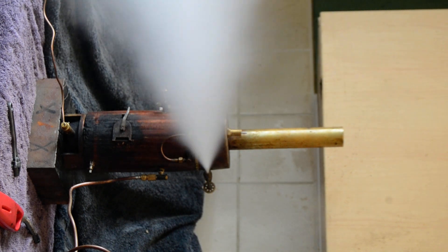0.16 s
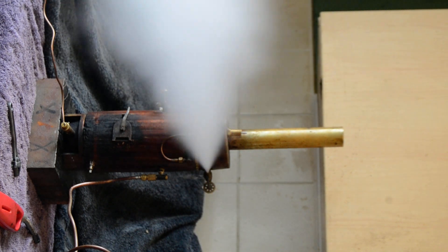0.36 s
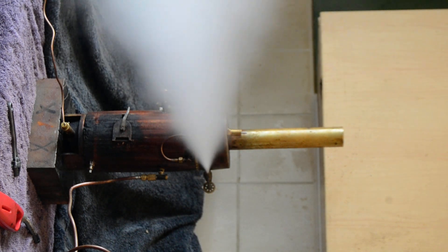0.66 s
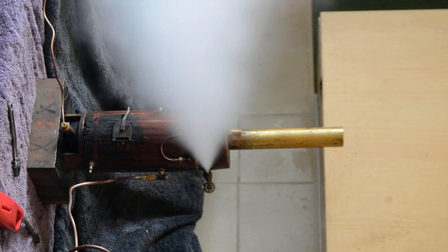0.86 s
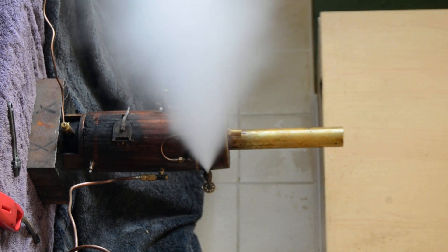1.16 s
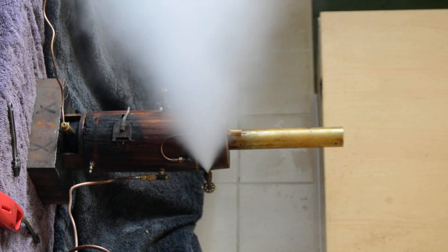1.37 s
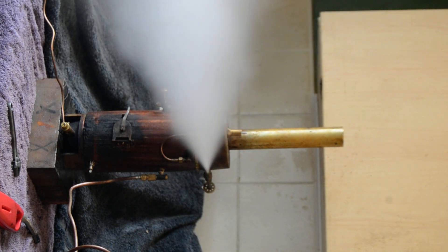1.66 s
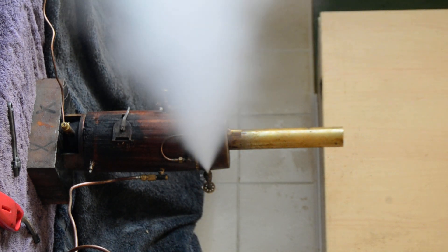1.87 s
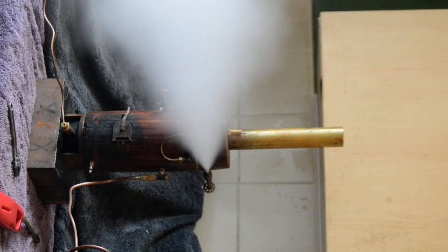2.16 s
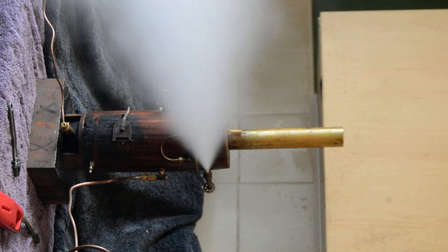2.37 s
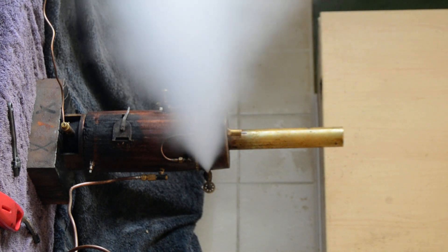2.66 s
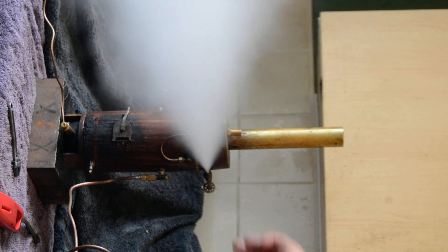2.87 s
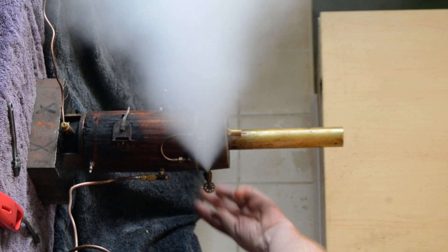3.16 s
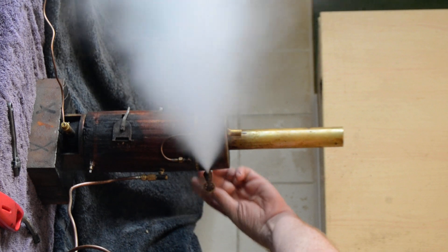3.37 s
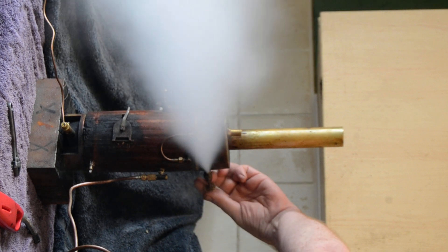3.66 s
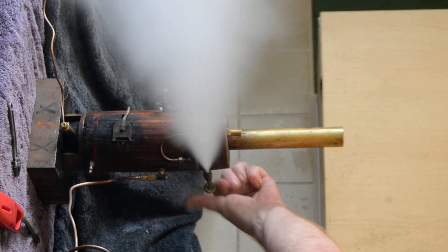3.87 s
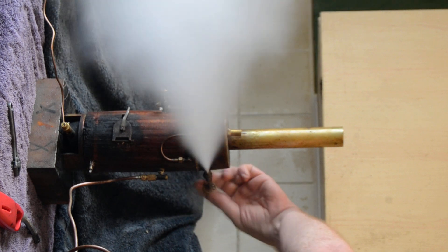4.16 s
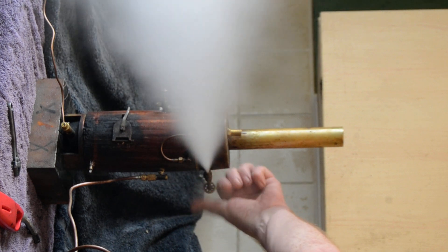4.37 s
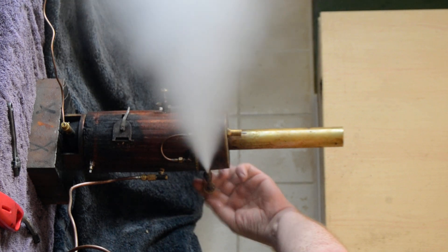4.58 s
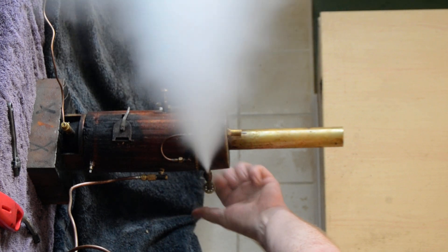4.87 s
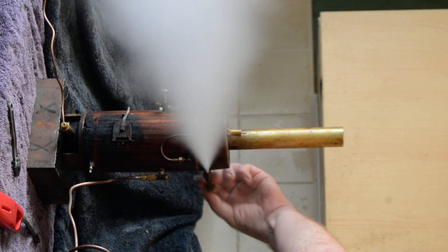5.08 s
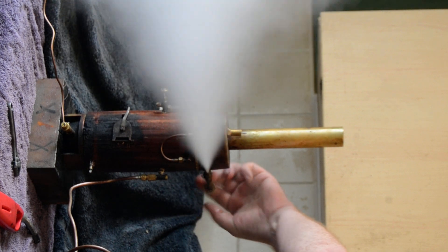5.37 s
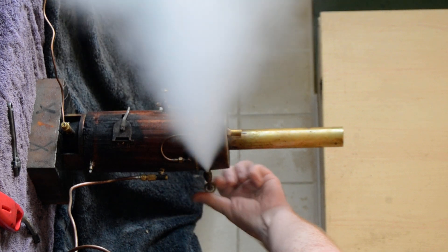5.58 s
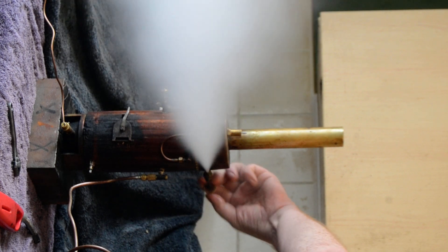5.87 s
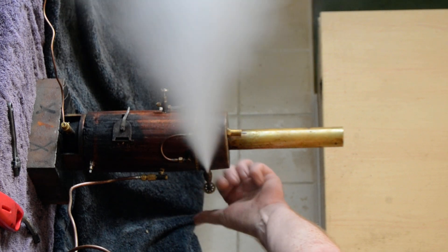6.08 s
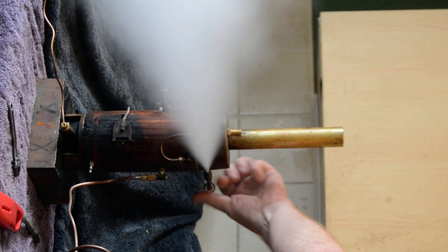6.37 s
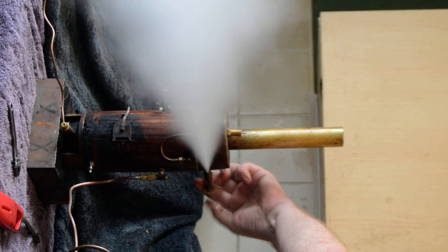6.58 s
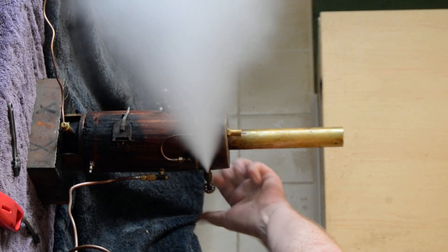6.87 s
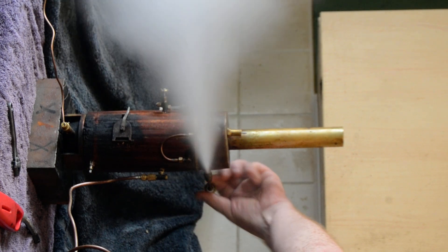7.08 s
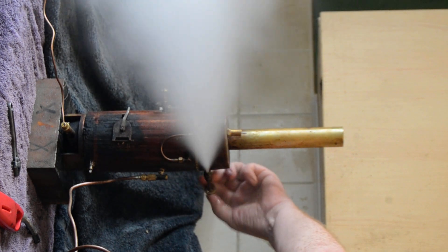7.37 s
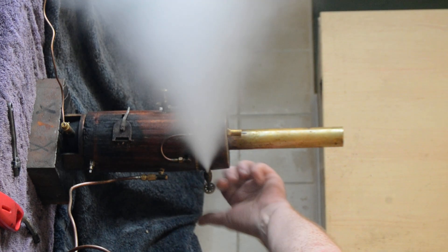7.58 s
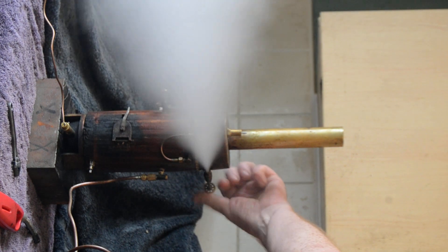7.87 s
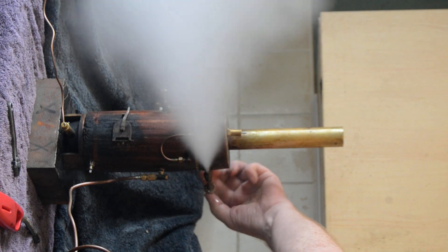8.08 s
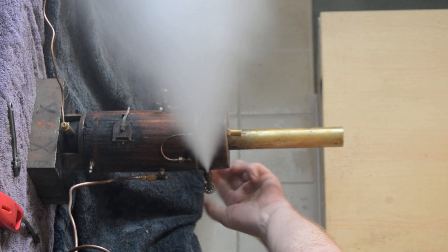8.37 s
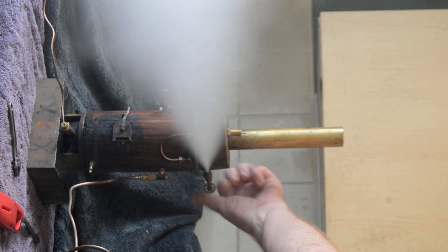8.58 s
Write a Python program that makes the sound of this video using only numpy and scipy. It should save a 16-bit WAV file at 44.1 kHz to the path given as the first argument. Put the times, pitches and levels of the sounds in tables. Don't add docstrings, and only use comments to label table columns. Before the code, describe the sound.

Steady high-pressure steam rushes from a small boiler's valve, heard very close in a hard, short-echoing room. It begins at full strength, fairly even, then grows more sputtery as a hand works the wheel, with quick dips and muffled surges around the middle and later part. A weak rumbling draught breaks up below the hiss. The sound is gritty, centred and still blowing at the end.

```python
import sys
import numpy as np
from scipy import signal
from scipy.fft import rfft, irfft, next_fast_len
from scipy.io import wavfile
from scipy.ndimage import uniform_filter1d

SR = 44100
rng = np.random.default_rng(int(sys.argv[2]) if len(sys.argv) > 2 else 0)


def to_wav(sig):
    pcm = np.clip(np.atleast_2d(sig), -1, 1) * 32767
    pcm = np.round(pcm).astype(np.int16)
    wavfile.write(sys.argv[1], SR, pcm.T)


def boost_factor(decibels):
    exponent = np.asarray(decibels, float) / 20
    return 10 ** exponent


N = 385423

# frequency in Hz, time to fall 60 dB in s.
ROOM_DECAY = [(300, 0.39), (2000, 0.26), (9000, 0.18)]
# delay in ms, gain.
ECHOES = [(1.07, -0.019), (1.4, 0.007), (2.05, -0.0023), (4.8, 0.01), (5.85, -0.022), (7.4, -0.034),
          (9.54, 0.038), (22.3, -0.11)]
# frequency in Hz, width in Hz, level in dB.
STANDING_WAVES = [(231, 30, -1.2), (339, 30, 1.2), (458, 30, -1.6), (522, 30, 1.8), (587, 30, 1.3),
                  (888, 130, -0.9), (1136, 30, -1.6), (1222, 30, -2.9), (1362, 80, 1.9), (1567, 30, 2.5),
                  (1642, 30, -3.1), (1986, 50, 2.3), (2417, 30, 3.6), (2676, 30, -3.0), (2998, 30, -5.5),
                  (3106, 50, 2.3), (3978, 25, 4.5), (4646, 40, -3.8), (4904, 40, 3.7), (5303, 70, -2.6),
                  (5755, 70, 2.3), (7122, 40, 5.7), (7208, 40, -3.3), (7284, 25, 5.3), (7822, 40, -3.9),
                  (7930, 110, -6.8), (8317, 40, 4.1), (8511, 25, 4.7), (9146, 70, 4.5), (9932, 40, 4.1)]
# start in seconds, length in seconds, drop in dB.
LULLS = [(.5, .14, 5), (1.05, .08, 4), (1.56, .24, 8), (2.16, .1, 5), (2.5, .08, 6), (2.73, .1, 8),
         (2.92, .1, 5), (3.16, .34, 4), (3.66, .14, 5), (4.17, .18, 7), (4.55, .14, 5), (4.88, .17, 10),
         (5.31, .2, 8), (5.67, .16, 7), (6.05, 0.13, 6), (6.4, .09, 6), (6.6, .1, 8), (6.87, .07, 6),
         (7.04, 0.25, 9), (7.7, .11, 9), (8.02, .06, 5), (8.13, .05, 5), (8.27, .24, 14), (8.6, .2, 8)]
# time in seconds, choke in dB, roar surge in dB, muffling in dB,
# clearing time in seconds.
SLUGS = [(0.103, 0.0, 0.7, 2, 0.18), (0.491, 2.5, 1.5, 3.5, 0.13), (0.624, 1, 1.5, 3.3, 0.079),
         (1.565, 2, 4, 2.9, 0.25), (2.271, 2, 2.5, 2.3, 0.19), (2.714, 1.8, 6.5, 1.5, 0.69),
         (3.33, 0.0, 5, 0.5, 0.27), (3.812, -0.5, 6.5, 1, 0.27), (4.137, 0.8, 3.5, 1.8, 0.45),
         (4.55, 1.2, 3.5, 3, 0.17), (4.907, 1.0, 3, 4.5, 0.23), (5.321, 0.2, 0.5, 4, 0.14),
         (5.677, 3, 2.5, 5, 0.13), (6.041, 3.5, 2.5, 5.5, 0.21), (6.414, 2.5, 3, 3.5, 0.11),
         (6.6, 2.5, 4, 3.5, 0.11), (6.84, 3, 1.1, 3, 0.16), (7.065, 7, 5.5, 7, 0.24),
         (7.589, 0.5, 2, 1.6, 0.64), (7.708, 2.2, 7.5, 4.5, 0.066), (7.955, 0.5, 0.5, 1.5, 0.6),
         (8.286, 3.5, 7.5, 1.5, 0.19), (8.407, 3, 2, 2.2, 0.55), (8.727, 4, 12.5, 3.0, 0.04)]
# time in seconds, wetness in dB of roar.
WETNESS = [(0.0, 2.2), (0.79, 2.1), (1.59, 0.45), (2.38, 2), (3.18, -4.5), (3.97, -1.5), (4.77, 0.9),
           (5.56, 2), (6.36, 1.7), (7.15, 1.65), (7.95, 0), (8.74, -0.5)]
# frequency in Hz, density in dB per Hz.
HISS_COLOUR = [(20, 3), (60, -11.5), (170, -17.5), (300, -14.5), (450, -12.5), (900, -8), (1400, -6.5),
               (2900, -5), (3150, -3), (5500, -2.5), (8300, -2), (9250, 0), (10500, -4), (13600, -16.5)]
# frequency in Hz, share of the swing.
ROAR_SHARE = [(150, 0.1), (300, 1.05), (1500, 1.4), (2500, 0.68), (3100, 0)]
FLARE_SHARE = [(2500, 0.42), (3100, 0.87), (4300, 0.52), (5500, 0.069)]
FIZZ_SHARE = [(7000, 0.076), (8500, 0.96), (10500, 1.07), (12000, 1.8)]
# response to choke, surge, muffling and wetness in dB per dB.
LEVEL_LAW = (-0.44, 0.11, -0.018, 0.14)
ROAR_LAW = (-0.32, 0.65, -0.42, 0.84)
FLARE_LAW = (-0.4, 0.17, 0.86, 0.41)
FIZZ_LAW = (0.0077, -0.18, -0.99, -0.28)
DRAUGHT_LAW = (-0.35, -.1, -.3, .3)
# time in seconds, half length in seconds, frequency in Hz,
# half width in Hz, level in dB.
SEAT_SONG = (3.46, .17, 3130, 50, 5)
# frequency in Hz, width in Hz, level in dB.
PORT_NOTCH = (7950, 500, -3.5)
# frequency in Hz, level in dB.
SAMPLING_EDGE = [(10000, 0.5), (10500, -1.5), (11000, -6.5), (11500, -15.5), (11800, -30), (12000, -55)]
# frequency in Hz, level in dB.
MIRROR_LEAK = [(12000, 0), (12300, -8), (12700, -13), (13300, -32.5), (13500, -34), (13700, -50)]
# time in seconds, low edge in Hz, high edge in Hz.
SPLIT_BANDS = [(1.074, 11070, 12490), (1.477, 4500, 5800), (1.477, 9500, 11100), (1.477, 11650, 13700),
               (1.971, 5140, 6340), (2.525, 5560, 6970), (2.525, 7450, 8960), (2.85, 4210, 6180),
               (2.908, 8900, 10420), (3.257, 5180, 6400), (3.596, 5560, 6970), (3.701, 12250, 13700),
               (4.357, 4130, 6400), (4.821, 12250, 13700), (5.23, 6730, 8400), (5.811, 11030, 12490),
               (5.927, 4530, 6400), (7.378, 4100, 6370), (7.378, 6730, 8390), (7.378, 11680, 13170),
               (8.144, 5160, 6400)]


def evened(x):
    return x / np.sqrt(np.mean(x ** 2) + 1e-20)


def read(points, hz):
    f, value = np.transpose(points)
    return np.interp(np.log(hz + 1), np.log(f + 1), value)


def room(x, wet_db=-8, thin_hz=1800):
    taps = np.zeros(SR // 2)
    at = np.arange(60, len(taps) - 20, 20)
    at = at + rng.integers(0, 20, len(at))
    taps[at] = rng.choice([-1., 1.], len(at))
    hz, t, z = signal.stft(taps, SR, nperseg=256)
    decay_db = -60 * t / read(ROOM_DECAY, hz)[:, None]
    thinning = hz / np.hypot(hz, thin_hz)
    tail = signal.istft(z * boost_factor(decay_db) * thinning[:, None], SR, nperseg=256)[1]
    response = boost_factor(wet_db) * tail / np.linalg.norm(tail)
    response[0] += 1
    for ms, gain in ECHOES:
        response[round(ms * SR / 1000)] += gain
    size = next_fast_len(N + SR)
    hz = np.fft.rfftfreq(size, 1 / SR)
    standing_db = sum(db / (1 + (2 * (hz - f) / width) ** 2) for f, width, db in STANDING_WAVES)
    return irfft(rfft(x, size) * rfft(response, size) * boost_factor(standing_db), size)[:N]


def lulls(t, edge_s=0.015):
    s, length, drop_db = np.transpose(LULLS)[:, :, None]
    shut = np.tanh((t - s) / edge_s)
    reopened = np.tanh((t - s - length) / edge_s)
    return (0.5 * drop_db * (shut - reopened)).sum(axis=0)


def valve(t, choke_s=0.049, rise_s=0.023):
    s, choke_db, surge_db, muffle_db, clear_s = np.transpose(SLUGS)[:, :, None]
    since = t - s
    clearing = np.exp(-(np.maximum(since, 0) / clear_s) ** 2)
    burst = 0.5 * (1 + np.tanh(since / rise_s)) * clearing
    choke = (choke_db * np.exp(-(since / choke_s) ** 2)).sum(axis=0)
    surge = (surge_db * burst).sum(axis=0)
    muffling = (muffle_db * burst).sum(axis=0)
    wetness = np.interp(t, *np.transpose(WETNESS))
    return np.array([choke, surge, muffling, wetness])


def seat_song(hz, t):
    s, half_s, sing_hz, half_hz, sing_db = SEAT_SONG
    band = np.exp(-((hz - sing_hz) / half_hz) ** 2)
    moment = np.exp(-((t - s) / half_s) ** 4)
    return sing_db * np.outer(band, moment)


def jet(patchy_db=0.42, gusty_db=0.7, flutter_db=0.5, lumps_db=1.5, puffy=1.14, dying_db_per_s=-0.1):
    frames, hz = N // 256 + 5, np.fft.rfftfreq(1024, 1 / SR)
    t = np.arange(frames) * 256 / SR
    laws = np.array([LEVEL_LAW, ROAR_LAW, FLARE_LAW, FIZZ_LAW, DRAUGHT_LAW])
    level_db, roar, flare, fizz, draught = laws @ valve(t)

    real, imaginary, patches = rng.standard_normal((3, len(hz), frames))
    patches = uniform_filter1d(patches, size=16, axis=0)
    patches = evened(uniform_filter1d(patches, size=9, axis=1))
    gusts = evened(uniform_filter1d(rng.standard_normal(frames), size=5))
    unrest = uniform_filter1d(rng.standard_normal((4, frames)), size=9)
    unrest = evened(uniform_filter1d(unrest, size=9))

    roar, flare, fizz = np.array([roar, flare, fizz]) + flutter_db * unrest[:3]
    draught = draught + dying_db_per_s * t - lulls(t) + lumps_db * unrest[3]
    gusts_db = gusty_db * np.outer(np.clip(1.2 - hz / 5000, 0.55, 1), gusts)
    rumble_share = np.clip(3.2 - hz / 75, 0, 1)
    rumble_db = puffy * np.outer(rumble_share, draught - draught.mean())

    field_db = read(HISS_COLOUR, hz)[:, None] + level_db - level_db.mean()
    field_db = field_db + patchy_db * patches + gusts_db + rumble_db
    for share, change in ((ROAR_SHARE, roar), (FLARE_SHARE, flare), (FIZZ_SHARE, fizz)):
        field_db = field_db + np.outer(read(share, hz), change - change.mean())
    field_db = field_db + seat_song(hz, t)
    spectrum = (real + 1j * imaginary) * boost_factor(field_db)
    return evened(signal.istft(spectrum, nperseg=1024, noverlap=768)[1][:N])


def scene():
    return np.tile(boost_factor(-16.0) * evened(room(jet())), (2, 1))


def overload(x, lift_db=12, peak_hz=9300, width_hz=1800, drive=0.37, cut_hz=230):
    hz = np.fft.rfftfreq(N, 1 / SR) + 1
    ring = boost_factor(lift_db * np.exp(-((hz - peak_hz) / width_hz) ** 2))
    squashed = np.tanh(drive * evened(irfft(rfft(x) * ring, N)))
    bass_cut = 1 / np.sqrt(1 + (cut_hz / hz) ** 4)
    return np.std(x) * evened(irfft(rfft(squashed) / ring * bass_cut, N))


def sampled(x, sampling_hz=24000):
    size = SR * 9
    hz = np.fft.rfftfreq(size, 1 / SR)
    notch_hz, width, notch_db = PORT_NOTCH
    port_db = notch_db / (1 + ((hz - notch_hz) / width) ** 2)
    z = rfft(x, size) * boost_factor(read(SAMPLING_EDGE, hz) + port_db)
    fold = np.clip(sampling_hz * size // SR - np.arange(len(z)), 0, len(z) - 1)
    mirror = np.conj(z[fold]) * boost_factor(read(MIRROR_LEAK, hz))
    return irfft(np.where(hz > sampling_hz / 2, mirror, z), size)[:N]


def splits(x, split_db=-3.0):
    side, hz = np.zeros(N), np.fft.rfftfreq(2048, 1 / SR)
    window = signal.windows.kaiser_bessel_derived(2048, 4 * np.pi) ** 2
    for s, low_hz, high_hz in SPLIT_BANDS:
        at = round(s * SR) - 1024
        random_phase = np.exp(2j * np.pi * rng.random(len(hz)))
        z = abs(rfft(x[at:at + 2048])) * random_phase
        side[at:at + 2048] += window * irfft(z * (hz > low_hz) * (hz < high_hz))
    return boost_factor(split_db) * side


def low_pass(x):
    return signal.sosfilt(signal.butter(12, 13650, fs=SR, output="sos"), x)


def record(dry):
    mono = sampled(overload(dry[0]))
    side = splits(mono)
    return low_pass(np.array([mono + side, mono - side]))


dry = scene()
out = record(dry)
to_wav(out)
```